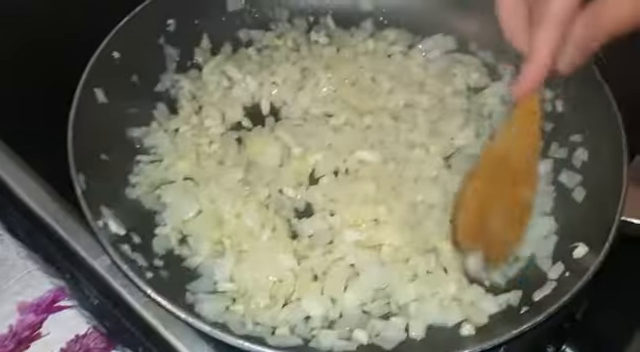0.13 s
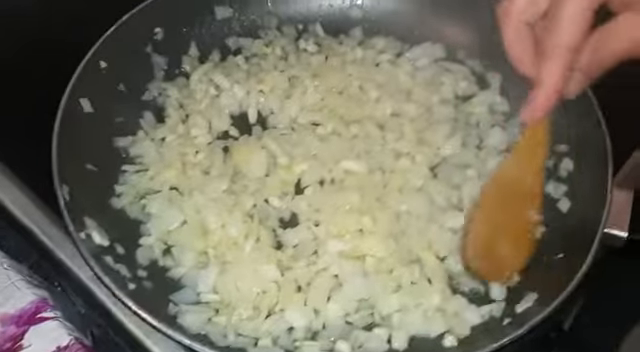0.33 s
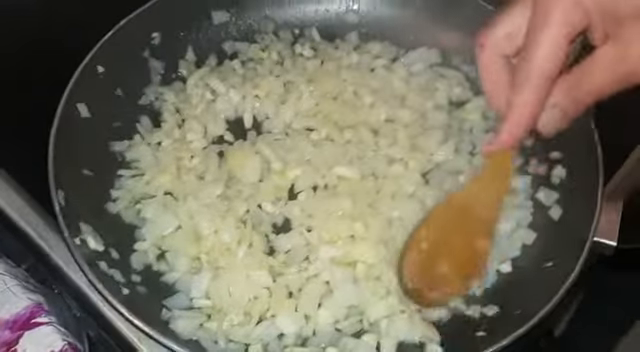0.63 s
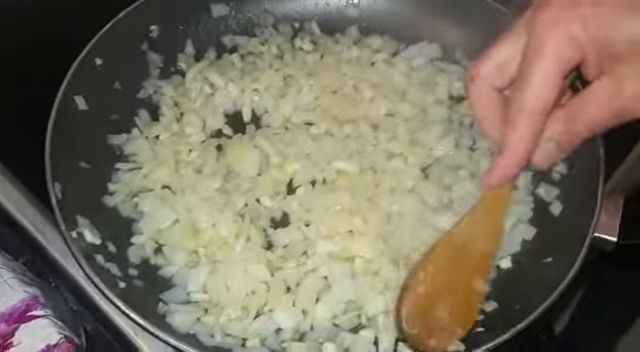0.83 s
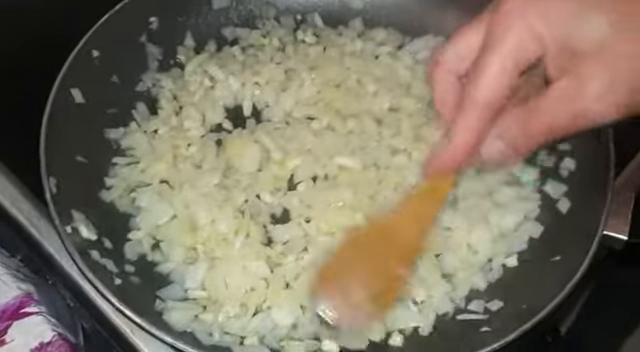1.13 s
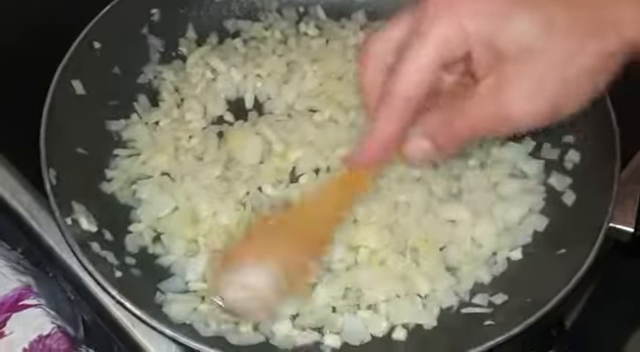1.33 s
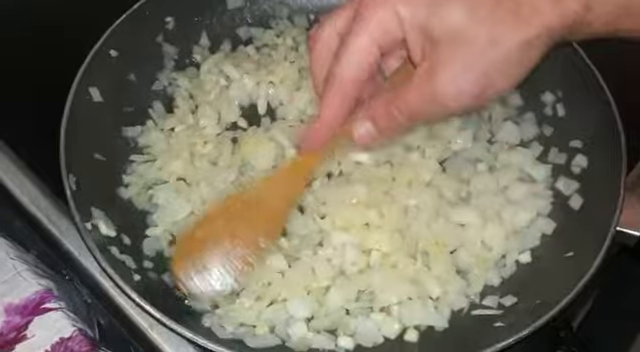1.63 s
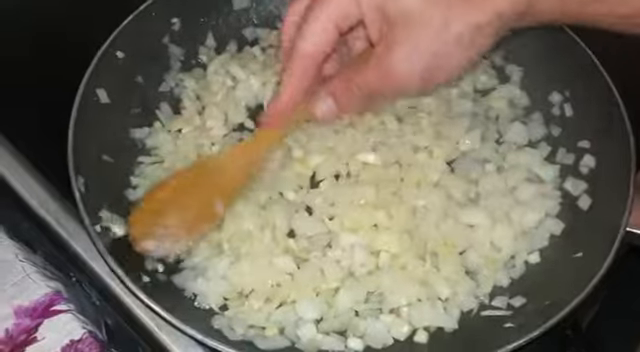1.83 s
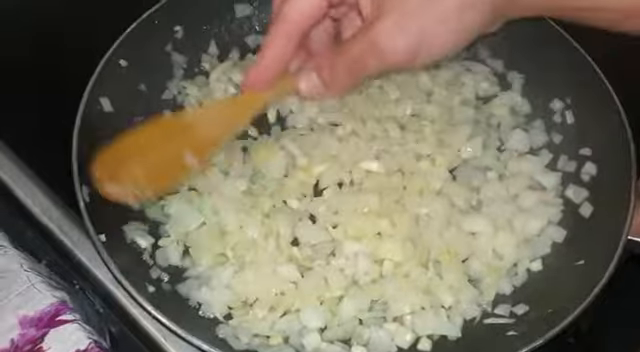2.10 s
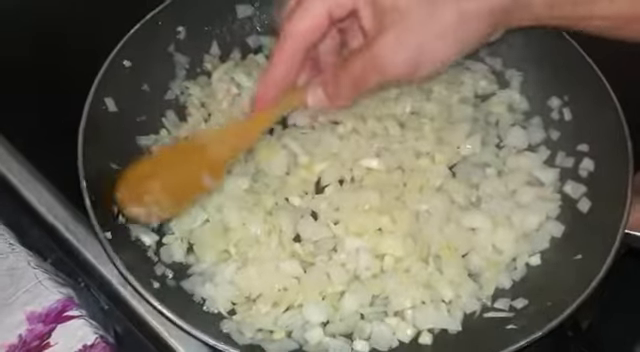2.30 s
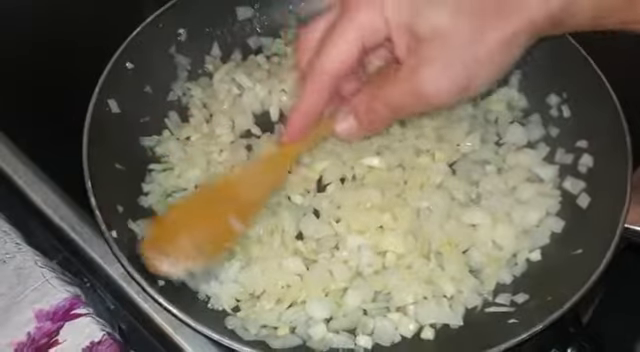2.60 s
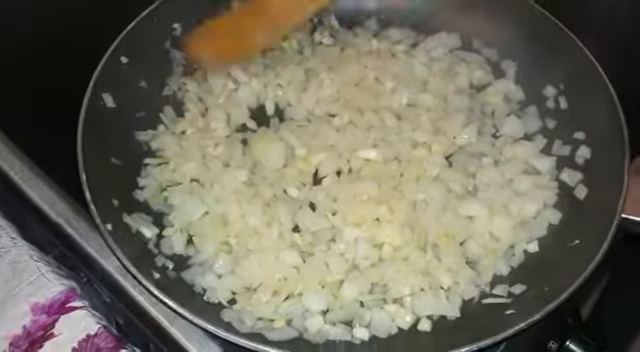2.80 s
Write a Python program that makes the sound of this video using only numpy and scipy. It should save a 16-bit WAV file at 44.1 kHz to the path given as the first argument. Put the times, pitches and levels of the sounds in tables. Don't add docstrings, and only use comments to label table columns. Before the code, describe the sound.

A wooden spoon knocks through chopped onions onto a frying pan: faint at 0.1 s, firmer from 0.5, strongest around 1.05-1.45, then duller pats at 1.8, 2.0 and 2.2 and a weak one near 2.5. Each gives a woody click, brief chatter and low damped boom. A soft food push comes at 2.74. Fine sizzle rises after 1.9 over gusty extractor rumble; small room, left side muffled.

```python
import sys
import numpy as np
from scipy import signal
from scipy.fft import rfft, irfft
from scipy.io import wavfile

SR = 44100
rng = np.random.default_rng(int(sys.argv[2]) if len(sys.argv) > 2 else 0)


def attenuation_scalar(level_db):
    decades = np.asarray(level_db, float) / 20
    return 10 ** decades


def unload_audio(sound):
    columns = np.transpose(np.atleast_2d(sound))
    steps = np.round(np.clip(columns, -1, 1) * 32767)
    wavfile.write(sys.argv[1], SR, steps.astype(np.int16))


N = 130095

# start_s, peak_db, spoon_pitch_hz, pan_boom_db, first_click_db (re chatter)
PATS = [(0.0886, -40, 1900, -49, 4), (0.2904, -27.5, 1800, -37.5, -4), (0.5129, -21.5, 1610, -41, -2.5),
        (0.7526, -22, 2250, -46.5, 2.5), (0.887, -40, 1800, -54, 0), (1.0563, -18.5, 1880, -41, -0.5),
        (1.2505, -18.5, 1970, -38.5, 2), (1.4251, -19, 1910, -37, -2.5), (1.774, -25, 1800, -36.5, -6),
        (2.008, -24, 1750, -40, -6.5), (2.2173, -20, 1960, -33, -3.5), (2.463, -34.5, 1600, -39, -15)]
# time_s, level_db
SIZZLE_LEVEL = [(0.0, -55), (1.74, -55), (1.93, -50.5), (2.13, -49.5), (2.75, -50), (2.95, -49)]


def rms_one(x):
    return x / np.sqrt(np.mean(x ** 2) + 1e-20)


def in_time(rows):
    return np.interp(np.arange(N) / SR, *np.transpose(rows))


def at_hz(points, hz):
    points_hz, points_db = np.transpose(points)
    return np.interp(np.log(hz + 1), np.log(points_hz), points_db)


def colour(x, points):
    gain = attenuation_scalar(at_hz(points, np.fft.rfftfreq(len(x), 1 / SR)))
    return irfft(rfft(x) * gain, len(x))


def drift(rate_hz):
    r = np.exp(-80 * np.pi * rate_hz / SR)
    white = rng.standard_normal(N // 40 + 2002)
    slow = signal.lfilter([1], [1, -2 * r, r * r], white)[2000:]
    return np.interp(np.arange(N) / 40, np.arange(len(slow)), rms_one(slow))


def peak(x, hz, width_hz):
    r = np.exp(-np.pi * width_hz / SR)
    poles = [1, -2 * r * np.cos(2 * np.pi * hz / SR), r * r]
    return signal.lfilter([(1 - r * r) / 2, 0, (r * r - 1) / 2], poles, x)


def ring(clicks, hz, t60_s):
    r, w = attenuation_scalar(-60 / (t60_s * SR)), 2 * np.pi * hz / SR
    return signal.lfilter([0, np.sin(w)], [1, -2 * r * np.cos(w), r * r], clicks + 1e-18)


def rumble():
    # hz, density_db_per_hz
    air_colour = [(20, -6), (42, -38), (62, 5), (95, 1), (130, -8), (260, -13.5), (480, -27.5), (1500, -31)]
    # time_s, level_db
    gust_level = [(0.0, -67), (0.03, -55), (0.25, -59), (0.38, -49.5), (0.5, -61), (0.81, -53), (1.03, -60),
                  (1.84, -51.5), (2.88, -54), (2.95, -59)]
    level_db, hum_hz, hum_db = 10, 28.4, -61.5
    air = rms_one(colour(rng.standard_normal(N), list(air_colour) + [(4000, -33)]))
    hum = attenuation_scalar(hum_db + 2.0 * drift(2)) * np.sin(2 * np.pi * hum_hz * np.arange(N) / SR)
    return attenuation_scalar(in_time(gust_level) + level_db) * air + hum


def sizzle():
    # hz, density_db_per_hz
    hiss_colour = [(1200, -17), (2100, -5), (3200, -4.5), (6400, -0.5), (7400, -2.5), (8400, -15),
                   (11000, -6.5), (16000, -10.5)]
    level_db, flicker_db, flicker_hz = 5, 0.8, 9.5
    spits_per_s, spit_spread_db, spit_share = 3200, 3.5, 0.1
    sizes = attenuation_scalar(spit_spread_db * rng.exponential(1, N))
    spits = (rng.random(N) < spits_per_s / SR) * sizes * rng.choice([-1, 1], N)
    mix = np.sqrt(spit_share) * rms_one(spits) + np.sqrt(1 - spit_share) * rng.standard_normal(N)
    level = attenuation_scalar(in_time(SIZZLE_LEVEL) + level_db + flicker_db * drift(flicker_hz))
    return level * rms_one(colour(mix, [(600, -19)] + list(hiss_colour)))


def covered_port():
    # hz, density_db_per_hz
    hiss_colour = [(30, -8), (300, 12), (2000, -64), (7500, -114), (8800, 13), (10800, 26), (12800, -7),
                   (15000, -15)]
    # centre_s, level_db, half_length_s
    rubs = [
        (0.357, -57, 0.056),
        (1.97, -54, 0.029),
    ]
    hiss_db, rub_cut_hz = -80.5, 53
    t = np.arange(N) / SR
    low = signal.butter(2, rub_cut_hz, fs=SR, output="sos")
    rub = rms_one(signal.sosfilt(low, rng.standard_normal(N)))
    rub_level = sum(attenuation_scalar(db) * np.exp(-((t - s) / half_s) ** 2) for s, db, half_s in rubs)
    hiss_level = attenuation_scalar(hiss_db + in_time(SIZZLE_LEVEL) - SIZZLE_LEVEL[0][1])
    return hiss_level * rms_one(colour(rng.standard_normal(N), hiss_colour)) + rub * rub_level


def knocks():
    # second_wood_hz, second_wood_db, flat_on_food_db, on_edge_db
    landing = [(1150, 2.5, 8.5, -3), (1510, 1, 9, 9), (1120, -6, -1, 4.5), (1600, -1.5, -0.5, 4.5),
               (1120, 2, 10.5, -5), (2360, -4.5, -2, 2.5), (2230, -1.5, -4, -0.5), (1340, -2, 1, 4.5),
               (374, 0.5, -2.5, -1), (362, 0.5, 0.5, 2), (1570, -0.5, -2, 3), (826, 4, 0.5, -10)]
    click_s, click_db, click_width_hz, spoon_db = 0.0002, -2.5, 4200, 13
    burst_s, burst_per_s, burst_db, burst_fall_db = 0.01365, 6000, -12, 7.5
    burst_width_hz, wood_rms = 260, 0.31
    bowl_hz, bowl_width_hz, bowl_db = 790, 820, -11
    thud_hz, thud_width_hz, thud_db = 288, 275, 3
    crack_hz, crack_width_hz, crack_db = 3100, 2200, -14
    size = 2048
    t = np.arange(size) / SR
    draws = rng.random((len(PATS), size))
    sizes = rng.standard_normal((len(PATS), size))
    blunt = np.exp(-((t[:64] - 2 * click_s) / click_s) ** 2 * 2)
    gate = np.clip((burst_s - t) / 0.0011, 0, 1) * attenuation_scalar(burst_db - burst_fall_db * t / burst_s)
    out = np.zeros((2, N + size))
    for pat, land, draw, big in zip(PATS, landing, draws, sizes):
        s, db, spoon_hz, _, first_db = pat
        second_hz, second_db, flat_db, edge_db = land
        start = int(s * SR)
        click_hits = -attenuation_scalar(click_db + first_db) * (t == 0)
        burst_hits = big * (draw < burst_per_s / SR) * gate
        for k, hits in enumerate([click_hits, burst_hits]):
            push = signal.lfilter(blunt, [1], hits)
            if k == 0:
                wood = attenuation_scalar(spoon_db) * peak(push, spoon_hz, click_width_hz)
            else:
                main = rms_one(peak(push, spoon_hz, burst_width_hz))
                second = rms_one(peak(push, second_hz, burst_width_hz))
                wood = wood_rms * (main - attenuation_scalar(second_db) * second) / 3
            bowl = attenuation_scalar(bowl_db) * peak(push, bowl_hz, bowl_width_hz)
            thud = attenuation_scalar(thud_db) * peak(push, thud_hz, thud_width_hz)
            crack = peak(peak(hits, crack_hz, crack_width_hz), crack_hz, 4800)
            crack = attenuation_scalar(crack_db + edge_db) * 9 * crack
            out[k, start:start + size] += attenuation_scalar(db + 6) * (wood + attenuation_scalar(flat_db) * (bowl + thud) + crack)
    return out[:, :N]


def pan():
    # hz, level_db, t60_s
    pan_modes = [(234.4, -27, 0.29), (328, -34, 0.11), (426, -53, 0.36), (620, -8, 0.16), (658, -34.5, 0.3),
                 (1060, -46, .08), (1108, -19, .1), (1130, -55, .08), (1250, -31, .05), (1590, -53, 0.03),
                 (1860, -17, 0.056), (2164, -9.5, 0.045)]
    # hz, level_db, hold_s
    boom_modes = [(167, 2.5, 0.073), (192.5, -7, 0.07), (252.3, -8, 0.075)]
    mode_spread_db, boom_rise_s, boom_db = 3.0, 0.0031, 5
    s, pat_db, _, pat_boom_db, _ = np.transpose(PATS)
    at, out = (s * SR).astype(int), np.zeros(N + SR)
    spread = rng.standard_normal((len(s), len(pan_modes) + len(boom_modes)))
    for k, (hz, level_db, t60_s) in enumerate(pan_modes):
        clicks = np.zeros(N + SR)
        clicks[at] = attenuation_scalar(pat_db + level_db + mode_spread_db * spread[:, k]) * (-1) ** k
        out += ring(clicks, hz, t60_s)
    t = np.arange(SR // 3) / SR
    for i, db, row in zip(at, pat_boom_db + boom_db, spread[:, len(pan_modes):]):
        for (hz, level_db, hold_s), r in zip(boom_modes, row):
            shape = (1 - np.exp(-t / boom_rise_s)) * np.exp(-(t / hold_s) ** 2)
            wave = np.sin(2 * np.pi * hz * (1 + 0.01 * r) * t)
            out[i:i + len(t)] += attenuation_scalar(db + level_db + r) * shape * wave
    return out[:N]


def kitchen(x):
    # hz, t60_s
    room_t60 = [(150, 0.35), (500, 0.53), (1500, 0.26), (3000, 0.74), (7000, 0.45)]
    # hz, level_db
    room_colour = [(130, -4), (260, 3.5), (500, 2), (1000, 2.5), (2200, -10.5), (4000, -5), (8000, -3)]
    room_db, rise_s = -2, 0.0024
    t, tail = np.arange(SR // 2) / SR, 0
    white = rng.standard_normal((2, 2, len(t)))
    for k, low_hz in enumerate(90 * 2. ** np.arange(7)):
        octave = signal.butter(2, [low_hz, 2 * low_hz], "band", fs=SR, output="sos")
        band = signal.sosfilt(octave, white[k % 2])
        mid_hz = 1.4 * low_hz
        tail = tail + band * attenuation_scalar(at_hz(room_colour, mid_hz) - 60 * t / at_hz(room_t60, mid_hz))
    tail = tail * (1 - np.exp(-t / rise_s)) / 30
    return attenuation_scalar(room_db) * signal.fftconvolve(x[None], tail, axes=1)[:, :N]


def nudges():
    # start_s, level_db
    pushes = [
        (1.699, -66),
        (2.639, -71.5),
        (2.74, -48),
    ]
    puff_hz, puff_width_hz, t60_s = 220, 170, 0.076
    t = np.arange(N) / SR
    shape = sum(attenuation_scalar(db - 1 - 60 * np.abs(t - s - 0.01) / t60_s) for s, db in pushes)
    puff = peak(peak(rng.standard_normal(N), puff_hz, puff_width_hz), puff_hz, puff_width_hz)
    return shape * rms_one(puff)


def scene():
    # hz, gain_db (re right)
    cover = [(40, -31), (200, -26.5), (400, -37.5), (1400, -31), (2600, -29.5), (3800, -57), (7000, -121),
             (16000, -23)]
    cover_room_db, cover_click_db, cover_lag_s = 4.5, 6, 0.0001
    click, burst = knocks()
    others = burst + pan() + rumble() + sizzle() + nudges()
    left_tail, right_tail = kitchen(click + burst)
    under_cover = attenuation_scalar(cover_click_db) * click + others
    late = np.interp(np.arange(N) - cover_lag_s * SR, np.arange(N), under_cover)
    left = colour(late + attenuation_scalar(cover_room_db) * left_tail, cover) + covered_port()
    return np.array([left, click + others + right_tail])


def band_limit(x):
    return signal.sosfilt(signal.butter(12, 16600, fs=SR, output="sos"), x)


def record(dry):
    low_pass = signal.ellip(12, 0.3, 70, 15820, fs=SR, output="sos")
    mix = signal.sosfilt(low_pass, dry)
    return band_limit(mix)


dry = scene()
out = record(dry)
unload_audio(out)
```